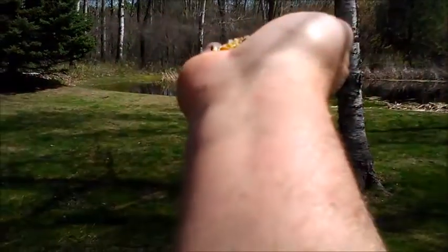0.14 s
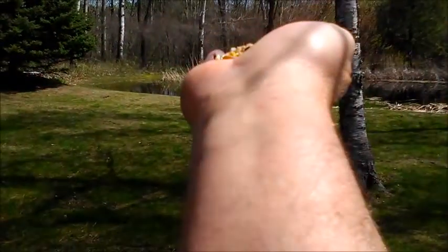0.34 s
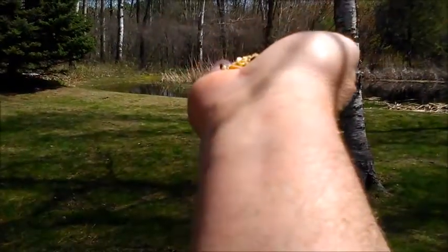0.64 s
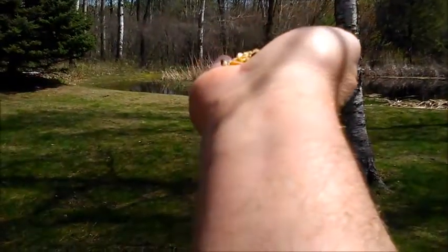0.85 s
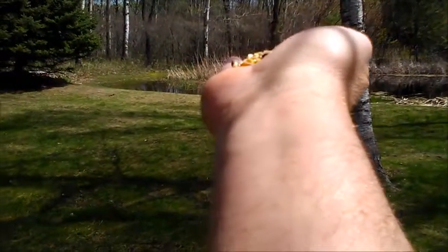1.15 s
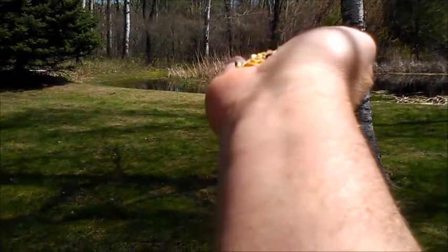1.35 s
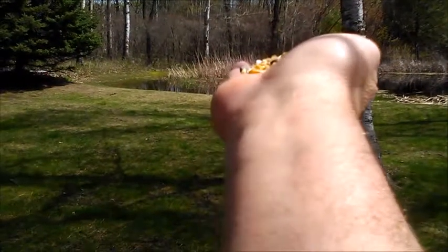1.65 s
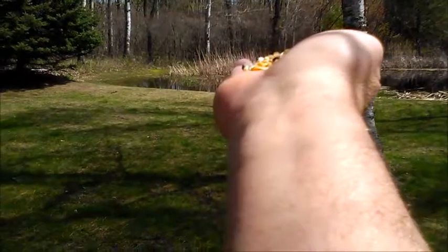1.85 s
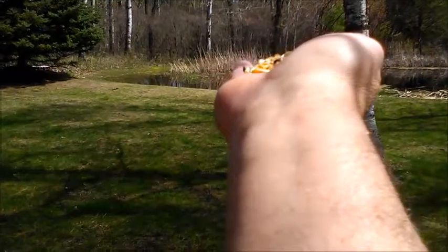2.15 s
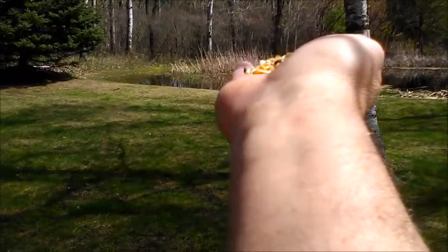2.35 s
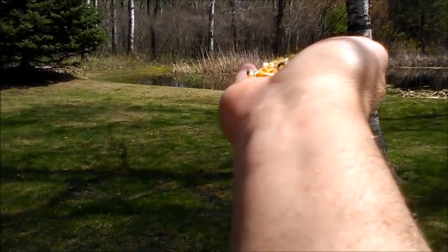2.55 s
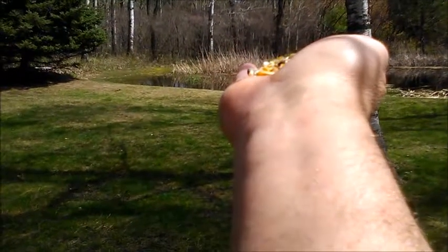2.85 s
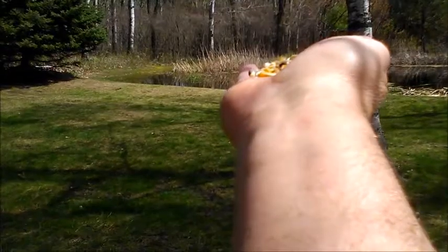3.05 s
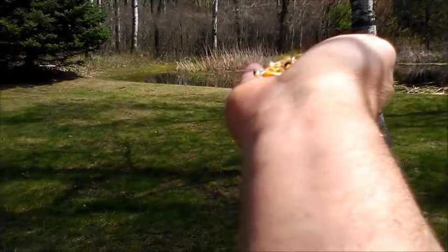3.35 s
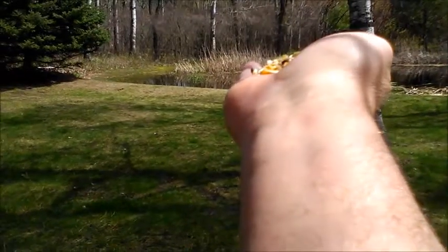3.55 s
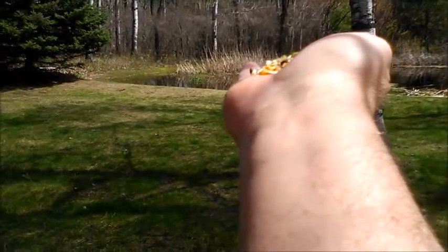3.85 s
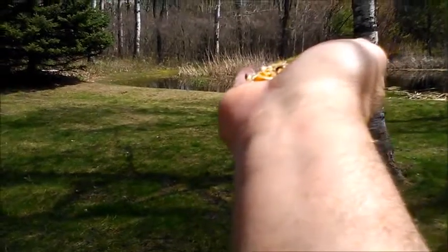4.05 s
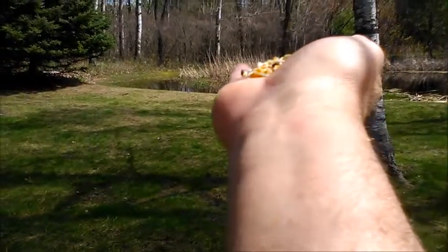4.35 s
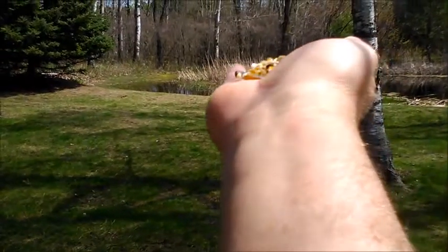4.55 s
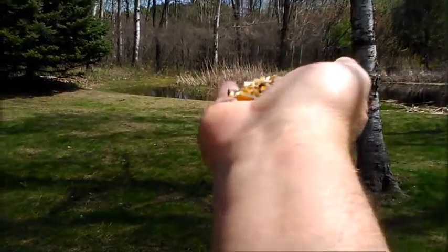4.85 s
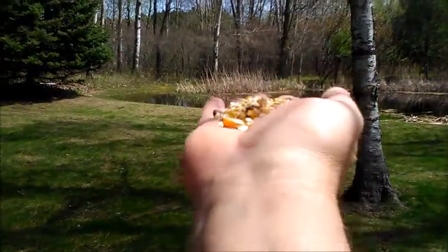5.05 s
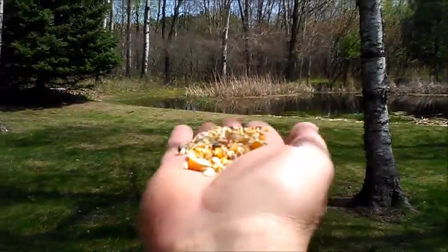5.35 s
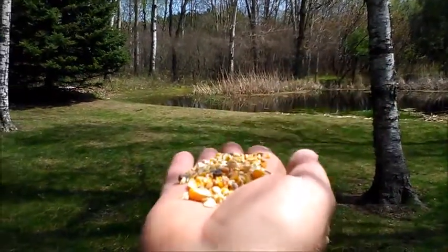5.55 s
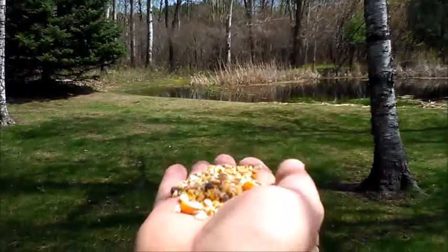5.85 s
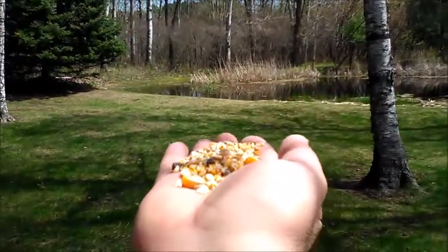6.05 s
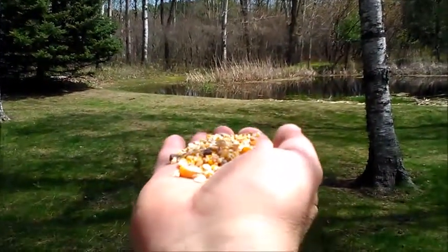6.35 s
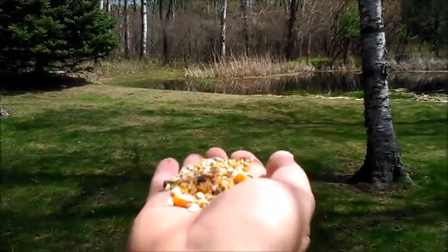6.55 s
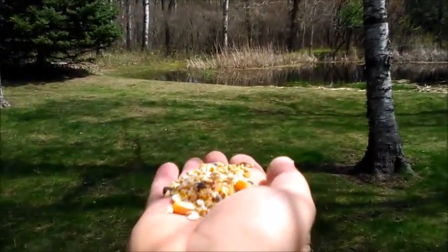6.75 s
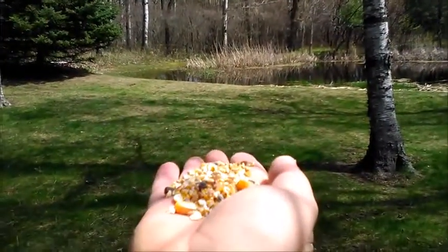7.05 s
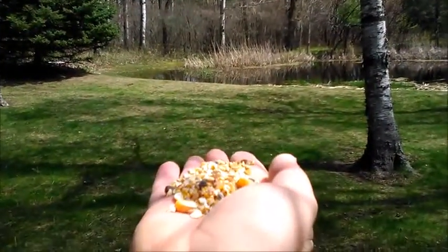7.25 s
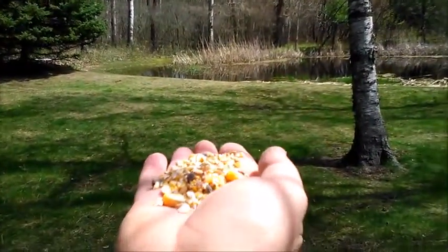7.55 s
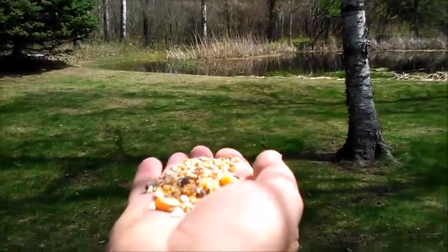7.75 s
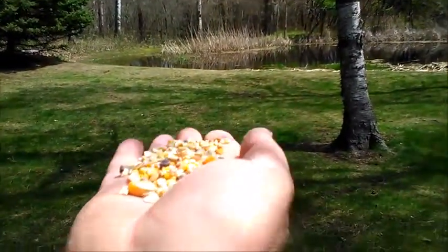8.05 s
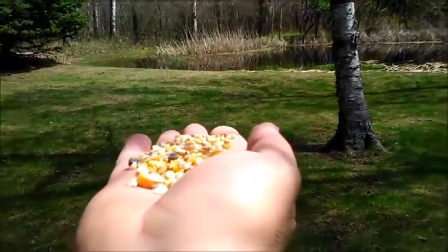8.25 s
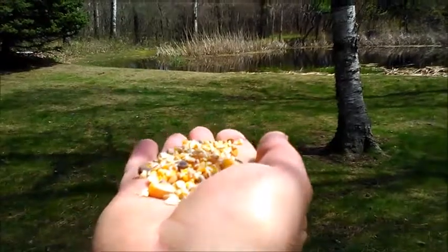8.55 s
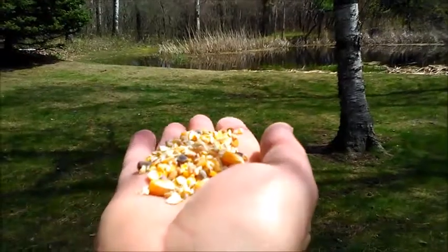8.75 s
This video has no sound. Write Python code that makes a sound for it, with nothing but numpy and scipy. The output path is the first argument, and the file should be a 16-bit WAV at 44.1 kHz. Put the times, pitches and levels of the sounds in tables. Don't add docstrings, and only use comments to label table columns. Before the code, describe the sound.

A quiet lawn beside a pond and trees, heard through a small hand-held microphone with faint hum and thin hiss. Low wind rumble opens, fading by 0.3 s. High thin chips lead into a quick, raspy chickadee gargle at 0.6 s, ending in a tiny rattle. Dull breeze thumps bunch at 1.3-1.9 s. More chips at 1.7 s precede the loudest gargle at about 2 s. From 1.9 to 4.2 s a distant sparrow trills evenly, about ten notes a second, slowing slightly, with faint wavering whistles. A calm stretch follows, with a very faint insect buzz from 4.5 to 6.7 s. Sharp notes come at 5.5-5.9 s and 6.3 s, then a last gargle at 6.5 s amid heavy thumps lasting past 7 s. At 7.1-7.6 s three rising chicks and three hazy notes lead to two hoarse, buzzy dees at 7.7 and 7.9 s. Soft wind thumps and rumble close near 8.9 s.

```python
import sys
import numpy as np
from scipy import signal
from scipy.fft import rfft, irfft, next_fast_len
from scipy.io import wavfile
from scipy.ndimage import uniform_filter1d, map_coordinates

SR = 44100
rng = np.random.default_rng(int(sys.argv[2]) if len(sys.argv) > 2 else 0)


def elevation(decibels):
    levels = np.asarray(decibels, float)
    return 10 ** (levels / 20)


def materialize(psi):
    bounded = np.clip(np.atleast_2d(psi).T, -1, 1)
    quanta = np.round(bounded * 32767).astype(np.int16)
    wavfile.write(sys.argv[1], SR, quanta)


N = 393372

# (time [s], kick level [dB], rumble level [dB])
PUFFS = [(0.022, -43, -39.5), (1.04, -69, -43.5), (1.335, -41.5, -35), (1.388, -35.5, -36),
         (1.484, -42, -30.5), (1.539, -24.5, -37.5), (1.856, -43.5, -42.5), (2.263, -67, -37),
         (3.52, -51.5, -43), (3.615, -70, -40.5), (4.238, -52, -50.5), (6.169, -61, -46),
         (6.56, -37.5, -41), (6.663, -30, -43), (6.678, -24.5, -34.5), (6.724, -28.5, -49),
         (6.775, -34.5, -34), (6.837, -24.5, -45), (6.94, -35, -42), (6.962, -28, -38),
         (7.015, -40.5, -44.5), (7.154, -39, -40.5), (7.266, -49, -41.5), (7.309, -39.5, -35),
         (7.457, -30, -37.5), (7.816, -40.5, -61), (8.341, -46, -41.5), (8.532, -45.5, -32),
         (8.767, -42, -44.5)]
# (time [ms], pitch [Hz], level [dB])
OPENING_STROKES = dict( tsip=[[(0, 6100, -11), (31.9, 5950, -2), (39.6, 5730, -2.5), (48.8, 4350, -7.5)]],
                   see=[[(0, 8800, -16), (6, 7800, -2), (20, 7500, 0), (24, 6800, -16), (30, 4800, -25)]],
                   blip=[[(0, 4150, -8), (7, 4250, 0), (11, 4400, -8)]], arch=[[(0, 4900, -15.5),
                   (4, 5650, -8.5), (13.9, 6340, -0.5), (17, 5000, -8.5), (21.9, 4260, -16)],
                   [(0, 9700, -37), (5, 11500, -36), (14, 12700, -38), (19, 8500, -39)]], )
RASP_STROKES = dict( rasp=[[(0, 4200, -23.5), (9, 4600, 6), (20, 4400, -5)], [(25.8, 4600, -11),
                (31, 4400, 12.5), (39.6, 4300, -29.5)]], rasp_mid=[[(17.93, 4700, -8), (21.06, 5600, 5),
                (25, 5950, 1.5), (29.1, 5700, 1), (32.6, 4500, -5)], [(33, 5500, -11), (38.8, 6800, -10.5),
                (47.5, 3600, -18)], [(0, 1700, -26), (8, 2450, -20.5), (13, 2800, -29), (25.6, 2450, -24)],
                [(33.1, 3200, -21), (38, 2900, -21), (50, 2750, -25.5)]], rasp_top=[[(0, 8300, -3),
                (13.1, 7000, 4.5), (34.3, 8400, 4)], [(0, 8600, -10), (20.2, 9600, 8), (28.8, 10300, -6.5)],
                [(29.8, 9200, 2.2), (37.4, 7600, 2)], [(2, 16000, -10), (38, 16000, -18.5)]])
CLOSING_STROKES = dict( ticks=[[(0, 5000, -12.5), (5, 4400, -9)], [(5, 7500, -7.5), (6.5, 5700, 2.5),
                   (10, 4250, -4)], [(21, 8300, -24), (29, 6500, -22)], [(30, 4500, -9), (36, 4300, -9)]],
                   end=[[(25, 1870, -16), (28.3, 2970, -10.5), (30.4, 3400, -12.5), (39.4, 3300, -21.5)],
                   [(24, 4200, -24), (29, 6500, -17)], [(46, 5600, -24), (53, 4200, -21)], [(42, 2950, -22),
                   (52, 2800, -18.5), (59.5, 1670, -32)]], )
# (rise [ms], top pitch [Hz], knee [ms])
CHICK_SHAPES = dict(long_chick=(57, 7920, 5.5), chick=(37, 7500, 8), short_chick=(20, 7120, 5.5))
# (time [s], core level [dB], low rasp level [dB], closing level [dB], lawn bounce delay [ms])
GARGLES = [
    (0.596, -36.5, -41, -66.5, .68),
    (1.965, -32, -40, -57.5, .68),
    (6.531, -38.5, -52.5, -58, 1.213),
]


def unit(x):
    return x / np.sqrt(np.mean(np.abs(x) ** 2) + 1e-20)


def along(points, hz):
    f, v = np.transpose(points)
    return np.interp(np.log(hz + 1), np.log(f + 1), v)


def curves(rows):
    s, *cols = np.transpose(rows)
    return [np.interp(np.arange(N) / SR, s, c) for c in cols]


def wobble(rate, size=N):
    knots = rng.standard_normal(int(size * 4000 / SR) + 4)
    return map_coordinates(knots, [np.arange(size) * min(rate, 4000) / SR])


def filtered(x, response):
    m = next_fast_len(len(x) + 8192)
    return irfft(rfft(x, m) * response(np.fft.rfftfreq(m, 1 / SR)), m)[:len(x)]


def noise(spectrum):
    return unit(filtered(rng.standard_normal(N), lambda hz: elevation(along(spectrum, hz))))


def gate(size, edge_ms):
    n = np.arange(size)
    to_edge = np.minimum(n, size - n)
    return np.sin(np.pi / 2 * np.clip(to_edge / (edge_ms * SR / 1000), 0, 1)) ** 2


def add(track, s, x):
    part = track[round(s * SR):][:len(x)]
    part += x[:len(part)]


def gusts():
    # (time [s], level [dB])
    steady_push = [(0.0, -41.5), (.26, -46), (.34, -69.5), (1.2, -57.5), (2.1, -60.5), (2.55, -69.5),
                   (3.7, -66.5), (3.86, -68), (4.07, -83), (4.12, -53), (4.45, -67), (6.5, -57.5),
                   (6.72, -46), (7.65, -58.5), (7.95, -47.5), (8.92, -38)]
    rise_s, hold_s, fall_db_per_s = 0.0071, 0.025, 163.5
    power = elevation(curves(steady_push)[0]) ** 2
    t = np.arange(SR // 2) / SR
    fall = elevation(-fall_db_per_s * np.clip(t - rise_s - hold_s, 0, 1))
    shape = np.clip(t / rise_s, 0, 1) * fall
    for s, _, db in PUFFS:
        add(power, s, (elevation(db) * shape) ** 2)
    return 10 * np.log10(power)


def steadied(x, share):
    envelope = np.abs(signal.hilbert(x, next_fast_len(N)))[:N]
    size = uniform_filter1d(envelope, size=900)
    return unit(x / (size + 0.21) ** np.clip(share, 0, 1))


def pops():
    ring_hz, kick_hz, rise_per_db, scatter = 55, 91.2, 0.029, 0.2
    out, t = np.zeros(N), np.arange(SR // 10) / SR
    for (s, db, _), chance in zip(PUFFS, rng.standard_normal(len(PUFFS))):
        hz = kick_hz * (1 + rise_per_db * (db + 35.5) + scatter * chance)
        swing = np.sin(2 * np.pi * np.cumsum(ring_hz + 1.93 * hz * np.exp(-t / 0.0088)) / SR)
        onset = (1 - np.exp(-t / 0.0035)) ** 2
        add(out, s, elevation(db + 7.0 - 60 * t / 0.083) * onset * swing)
    return out


def breeze():
    # (frequency [Hz], density [dB per Hz])
    thump_spectrum = [(27, -39.5), (40, -7), (55, -2), (85, -4.5), (130, -19.5), (200, -32), (350, -81)]
    puff_spectrum = [(60, -29), (130, 9), (200, -9.5), (320, -22.5), (600, -41.5), (1200, -88)]
    thump_db = gusts()
    thumps = unit(elevation(4.9 * wobble(8)) * steadied(noise(thump_spectrum), share=0.2))
    edge_level = elevation(-17.5 + 0.13 * (thump_db + 44.5))
    edge = edge_level * unit(elevation(2.6 * wobble(30)) * noise(puff_spectrum))
    return elevation(thump_db) * (thumps + edge) + pops()


def air():
    # (time [s], far hum level [dB], hiss level [dB])
    air_levels = [(0.0, -83, -80), (0.55, -86.5, -80), (2.2, -82, -80), (2.45, -85, -88.5), (4.1, -87, -92),
                  (5.69, -76.5, -85.5), (7.7, -82.5, -81.5), (8.92, -84, -96.5)]
    # (frequency [Hz], density [dB per Hz])
    hum_spectrum = [(88, -24), (150, -2.5), (403, -2.5), (529, -9.5), (726, -6.5), (1280, -19),
                    (2500, -26.5), (3250, -33), (5500, -120)]
    hiss_spectrum = [(5000, -21.5), (7800, -7), (13800, -12), (14300, -9.5), (14500, -64.5)]
    leaf_spectrum = [(900, -14.5), (1500, -4.5), (5500, -6), (9000, -10)]
    hum_db, hiss_db = curves(air_levels)
    t = np.arange(N) / SR
    whine = elevation(hiss_db - 1.5 + 1.6 * wobble(28)) * np.sin(2 * np.pi * 13480 * t + 2.0 * wobble(7.2))
    settling = noise([(150, 2.5), (700, -4.0), (3000, -15.0), (4500, -17.0), (9000, -38)])
    settling = elevation(-59 - 10 * np.clip((t - .2) / 0.13, 0, 3)) * settling
    hum = elevation(hum_db + 6.5 + wobble(9.4)) * noise(hum_spectrum)
    hiss = elevation(hiss_db + 4.5 + 1.3 * wobble(33)) * noise(hiss_spectrum)
    leaves = elevation(-83.5) * noise(leaf_spectrum)
    return hum + hiss + leaves + whine + settling


def background_dips(quiet):
    gap_times = [.278, 0.602, .96, 1.667, 1.793, 2.411, 2.581, 2.858, 2.935, 3.59, 3.901, 3.93, 3.989, 4.05,
                 4.568, 4.648, 4.8, 5.674, 5.76, 5.91, 6.037, 6.231, 6.272, 6.465, 6.632, 6.68, 7.084, 7.66,
                 7.85]
    gap_db, kept_share, band_hz = -15, .08, 90
    size = round(.024 * SR)
    out = quiet.copy()
    for s in gap_times:
        piece = quiet[round((s - .012) * SR):][:size] * gate(size, 5)
        kept = rng.random(300) < kept_share
        lines = filtered(piece, lambda hz: elevation(gap_db) + 2.0 * kept[(hz / band_hz).astype(int)])
        add(out, s - .012, lines - piece)
    return out


def syllables():
    # (time [ms], pitch [Hz], level [dB])
    loose_strokes = dict( seet=[[(0, 5960, 1.5), (14.2, 6050, 5.5), (26.6, 5500, -36)]],
                     pip=[[(0, 6000, -3), (4, 6900, 1.5), (8, 6400, -8)], [(3, 3300, -8), (14, 3350, -12)],
                     [(12, 5800, -10), (22, 5300, -13)]], hook=[[(0, 2900, -4), (9, 3500, 0),
                     (24, 1800, -3)]], chip=[[(0, 3100, -30), (4, 7090, 17.5), (12, 10100, -7.5)]],
                     tseet=[[(0, 6800, -6), (25.4, 7600, -1), (48.7, 7870, 7), (55, 5000, -12),
                     (59.2, 5060, -13)], [(10, 8400, -10), (29.8, 8600, -8)], [(39, 8900, -2),
                     (52, 9100, -15)]], )
    last_strokes = dict( a=[[(2.917, 3850, -23.5), (13.31, 4300, -12.5), (21.1, 5300, 0),
                    (25.35, 6200, 4.5), (28.9, 7000, 2.5), (30.6, 6500, 4), (33.3, 4900, -2),
                    (39, 3500, -28.5), (48, 2000, -25)], [(13.9, 4600, -4.5), (19.15, 6200, -4),
                    (22.1, 7500, -9), (30.2, 8300, -23), (39.7, 7300, -17)], [(31.9, 7100, -2),
                    (35.4, 5900, -3), (44, 4100, -18)], [(4, 1800, -36), (20, 2300, -32)]],
                    trill=[[(-1, 4100, -8), (1, 4800, -3), (4, 5600, -1), (7, 5750, 0), (14, 5800, -5)],
                    [(-10, 4000, -16), (-3.5, 4900, -12)]], tock=[[(0, 2390, 2), (4, 1780, 8.1)]])
    further_strokes = dict( flick=[[(30, 6100, -9), (38, 7600, -12)]], rise=[[(0, 5850, -16),
                       (14, 6200, -3), (22, 6250, 0), (27, 6150, -12)]], lilt=[[(0, 4700, 0), (16, 5150, 3),
                       (36, 5150, -3)]], droop=[[(0, 5500, -1), (20, 5350, 0), (36, 4800, -3)]],
                       thin=[[(0, 6700, -8), (18, 7150, -7), (55, 7250, 1), (91, 7300, 3)], [(56, 7300, 4),
                       (66.4, 6300, 3), (72, 5400, -10)]], blob=[[(0, 7600, -8.5), (12, 9200, -7),
                       (24, 5600, -2)], [(1.97, 5600, -9.5), (13, 7600, -1), (26.05, 6200, -8)]],
                       last=[[(0, 5820, 5.5), (3, 4460, -4), (8, 3880, -20)]])
    extra_strokes = dict(long_chick=[ [(20, 9100, -27), (34, 9800, -21), (50, 10200, -21)],
                     [(36, 2100, -36), (52, 2200, -35)]], chick=[[(7, 12100, -36), (15, 13200, -36)],
                     [(46, 3800, -30), (51, 2500, -37)]], short_chick=[[(-6, 4200, -16), (-1.5, 7000, -8)],
                     [(-10, 1900, -34), (0, 4000, -30)], [(7, 2200, -32), (20, 2000, -37)],
                     [(27, 4200, -24), (36, 2200, -33)]])
    start_hz, knee_hz, drop_ms, end_hz = 5020, 6170, 6.9, 3780
    out = {**OPENING_STROKES, **RASP_STROKES, **CLOSING_STROKES,
           **loose_strokes, **last_strokes, **further_strokes}
    for name, (ms, hz, knee_ms) in CHICK_SHAPES.items():
        rise = [(0, start_hz, -7), (.62 * knee_ms, knee_hz - 330, -1.5), (knee_ms, knee_hz, 1.5),
                (.55 * ms, .945 * hz, 2.5), (1.0 * ms, hz, -2.5), (ms, .975 * hz, -4)]
        drop = [(ms + 0.44 * drop_ms, 5700, -2.5), (ms + drop_ms, end_hz, -34)]
        second = [[(5, 9900, -29), (25, 8900, -26)], [(ms + 5, .96 * hz, -13), (ms + 14, 5400, -14)]]
        out[name] = [rise + drop] + second + extra_strokes[name]
    return out


def stroke(points, stretch, rough):
    ms, hz, db = np.transpose(points)
    flutter = wobble(700, size=4096), wobble(911, size=4096)
    t = np.arange(ms[0], ms[-1], 1000 / SR / stretch)[:4096]
    glide = uniform_filter1d(np.interp(t, ms, hz), size=40, mode="nearest")
    pitch = glide + 260 * rough * flutter[0][:len(t)]
    turn = 2 * np.pi * np.cumsum(pitch) / SR
    level = elevation(np.interp(t, ms, db)) * gate(len(t), 0.9)
    return level * (1 + rough * flutter[1][:len(t)]) * np.sin(turn)


def voiced(name, stretch, rough):
    # (frequency [Hz], density [dB per Hz])
    breath_spectrum = [(1500, -29.5), (4000, -8), (9500, 6.5), (11000, -10), (14000, -10)]
    note = np.zeros(SR // 8)
    for points in syllables()[name]:
        add(note, .02 + points[0][0] * stretch / 1000, stroke(points, stretch, rough))
    product = filtered(note ** 2, lambda hz: np.clip(hz / 1500, 0, 1) ** 4)
    breath = filtered(rng.standard_normal(len(note)), lambda hz: elevation(along(breath_spectrum, hz)))
    size = np.sqrt(np.abs(uniform_filter1d(note ** 2, size=200)))
    return note + elevation(-49.0 + 27.5 * rough) * product + elevation(-39 + 58.4 * rough) * size * breath


def echo(x):
    # (frequency [Hz], time to decay 60 dB [s])
    tree_decay = [(1500, 0.3), (4500, 0.18), (8000, 0.22), (13000, 0.15)]
    hz, t, z = signal.stft(rng.standard_normal(SR // 2), SR, nperseg=128)
    decay = elevation(-60 * t / along(tree_decay, hz)[:, None])
    tail = signal.istft(z * decay, SR, nperseg=128)[1]
    tail = tail * (1 + 1.2 * elevation(-60 * np.arange(len(tail)) / SR / 0.021))
    return signal.fftconvolve(np.pad(x, (130, 0)), tail / np.linalg.norm(tail) * 3.56)


def halo(x):
    size = round(44 * SR / 1000)
    haze = rng.standard_normal(SR // 10)[:size] * np.hanning(size)
    return signal.fftconvolve(x, haze / np.linalg.norm(haze), mode="same")


def sing(notes):
    roughness = dict(tsip=.12, see=.1, blip=.05, arch=.25, rasp=.45, rasp_mid=.25, rasp_top=.68, ticks=.2, end=.4, seet=.06, tock=.2, pip=.4, hook=.4, chip=.3, tseet=.09, long_chick=.2, chick=.15, short_chick=.2, a=.27, trill=.2, flick=.6, rise=.1, lilt=.3, droop=.3, thin=.35, blob=.42, last=.3)
    hazy = ("a", "tsip", "hook", "pip", "short_chick", "trill", "rasp", "rasp_mid", "rasp_top", "ticks",
            "end", "chip", "flick", "blob", "thin", "last")
    open_perch = {*OPENING_STROKES, *RASP_STROKES, *CLOSING_STROKES, *CHICK_SHAPES,
                  "a", "blob", "rise", "trill", "last"}
    out = np.zeros(N)
    for s, name, db, stretch in notes:
        echo_db = -17.5 + 19.5 * (name == "chip") - 6 * (name in open_perch)
        note = elevation(db) * voiced(name, stretch, roughness[name])
        halo_db = -7.5 + 3.5 * (name in ("a", "flick", "blob"))
        add(out, s - .02, note + (name in hazy) * elevation(halo_db) * halo(note))
        add(out, s - .02, elevation(echo_db) * echo(note))
    return out


def chips():
    # (time [s], syllable, level [dB], stretch)
    chip_notes = [(0.286, "tsip", -48.5, 0.73), (.489, "see", -51, 0.98), (.538, "blip", -62, 0.88),
                  (1.737, "tsip", -48, 0.99), (1.86, "see", -42.5, 0.93), (1.908, "blip", -54.5, .9),
                  (2.125, "hook", -65.5, 1.06), (5.552, "seet", -50, 1.2), (5.58, "tock", -60, 1.6),
                  (5.7, "chip", -81, 0.92), (5.82, "tseet", -43, 0.95), (6.277, "tsip", -47, 1.05),
                  (6.421, "see", -47.5, 1.32), (6.469, "tock", -68.5, 1.65), (6.692, "pip", -50.5, 1.2),
                  (8.449, "chip", -83, 1.34), (4.28, "lilt", -80, 1), (4.385, "thin", -73.5, 1.1),
                  (4.51, "droop", -81, 1), (7.131, "blob", -40, 1.05), (7.954, "rise", -45.5, 1),
                  (7.212, "blob", -50.5, .8)]
    return sing(chip_notes)


def far_whistles():
    whistles = [(0.58, 0.62, 5300, 1700, -57.5), (0.29, 0.597, 3380, 53, -88.5),
                (0.441, 0.603, 2260, 58, -85), (1.914, 2.015, 2540, 70, -78.5),
                (0.404, 1.363, 375.3, 12.7, -76), (1.579, 1.67, 1670, 57, -78),
                (1.672, 1.77, 1680, 53, -78), (1.768, 1.87, 1660, 56, -83), (2.092, 2.79, 2876, 560, -75),
                (3.55, 3.632, 2538, 40, -64), (3.629, 3.776, 2553, 33, -68.5),
                (3.643, 3.72, 1573, 82, -76.5), (3.718, 3.905, 3220, 570, -78.5),
                (3.751, 4.246, 2750, 400, -87.5), (4.102, 4.516, 2800, 500, -80),
                (4.298, 4.405, 5080, 250, -83.5), (4.439, 4.58, 6900, 1300, -75.5),
                (5.358, 5.448, 4720, 1300, -77), (6.861, 7.108, 3380, 110, -85),
                (7.083, 7.274, 3390, 83, -84)]
    out = np.zeros(N)
    for start, end, hz, width_hz, db in whistles:
        t = np.arange(round((end - start) * SR)) / SR
        swell = np.sin(np.pi * (t / (end - start)) ** .55)
        paths = 0.42 + 30 / width_hz + wobble(width_hz, size=SR) + 1j * wobble(width_hz, size=SR)
        blur = paths[:len(t)] * elevation(2.7 * wobble(20, size=SR)[:len(t)])
        add(out, start, elevation(db + 3.0) * swell * (unit(blur) * np.exp(2j * np.pi * hz * t)).real)
    return out


def gargles():
    # (time after the arch [ms], syllable, part: 0 core 1 low rasp 2 closing, level [dB], stretch)
    gargle_string = [
        (0, "arch", 0, 3.5, 1.04),
        (41.2, "rasp", 1, -4, 1.01),
        (41.9, "rasp_mid", 0, -3.5, 1.01),
        (41.8, "rasp_top", 0, -19.5, .99),
        (105, "ticks", 0, -4.5, .95),
        (262.5, "end", 2, 18, .95),
    ]
    return [(s + ms / 1000, name, parts[part] + db, stretch)
            for s, *parts in GARGLES for ms, name, part, db, stretch in gargle_string]


def rattles():
    # (stroke start [Hz], stroke end [Hz], upper level [dB], lower level [dB], last stroke level [dB])
    rattle_voices = [
        (6320, 4150, -69.5, -64.5, -66),
        (6540, 4200, -59.5, -61.5, -40),
        (6900, 4670, -52.5, -61, -42),
    ]
    landings = [1.9, 1.2, 0.16]
    after_s, length_ms, strokes_per_s = .2, 64, 232
    out = np.zeros(N)
    for (s, *_), (top_hz, end_hz, upper_db, lower_db, _), landing in zip(GARGLES, rattle_voices, landings):
        t = np.arange(int(length_ms * SR / 1000)) / SR
        slow = lambda per_s: wobble(per_s, size=4096)[:len(t)]
        cycle = (t * strokes_per_s + .2 * slow(110)) % 1
        fall = np.clip(cycle / .75, 0, 1)
        pitch = end_hz + (top_hz - end_hz) * (1 - fall) ** 1.4 + 250 * slow(150)
        swell = np.sin(np.pi * fall) * (1 + landing * fall) * elevation(3 * slow(200))
        upper = np.sin(2 * np.pi * np.cumsum(pitch) / SR) * swell
        lower_hz = 3250 - 450 * cycle + 110 * slow(260)
        throb = np.sin(np.pi * cycle) ** 2 * elevation(4 * slow(140))
        lower = np.sin(2 * np.pi * np.cumsum(lower_hz) / SR) * throb
        x = (elevation(upper_db + 4.3 * t / t[-1]) * upper + elevation(lower_db) * lower) * gate(len(t), 2.7)
        x = x + elevation(-4) * halo(np.pad(x, (0, 900)))[:len(t)]
        add(out, s + after_s, x)
        add(out, s + after_s, elevation(-17) * echo(x))
    last = [(s + .2622, "last", db, .95) for (s, *_), (*_, db) in zip(GARGLES, rattle_voices)]
    return out + sing(last)


def bounced(x):
    s, *_, ms = np.transpose(GARGLES)
    n = np.arange(N)
    current = np.clip(np.searchsorted(s - .1, n / SR) - 1, 0, None)
    late = ms[current] * SR / 1000
    return x + elevation(-9.5) * map_coordinates(x, [n - late])


def trill():
    # (time [s], level [dB])
    trill_levels = [(1.89, -60), (2.19, -62.5), (3.0, -59.5), (3.47, -67), (3.97, -78), (4.07, -66.5),
                    (4.18, -64.5)]
    start_s, gap_s, slowing_s = 1.8935, .0974, 3.4e-6
    k = np.arange(24)
    s = start_s + gap_s * k + slowing_s * k ** 3
    db, chance = np.interp(s, *np.transpose(trill_levels)), rng.standard_normal((len(k), 2))
    return [(at, name, level + spread_db * c, 1.01) for at, level, row in zip(s, db, chance)
            for name, spread_db, c in zip(("trill", "flick"), (1.8, 3), row)]


def insect():
    # (time [s], level [dB])
    buzz_levels = [(4.5, -93), (5.38, -78.5), (6.75, -80)]
    t = np.arange(N) / SR
    mode = lambda f: 1 / (1 + ((f - 5880) / 90) ** 2) + 0.12 / (1 + ((f - 5700) / 500) ** 2)
    wing = filtered(rng.standard_normal(N), mode)
    beat = 1 + 0.2 * np.sin(2 * np.pi * 80 * t + 0.83 * wobble(6.6))
    start, end = buzz_levels[0][0], buzz_levels[-1][0]
    on = np.clip((t - start) * 10, 0, 1) * np.clip((end - t) * 10, 0, 1)
    return on * elevation(curves(buzz_levels)[0] + 8.5) * unit(wing * beat)


def chick_a():
    # (time [s], syllable, level [dB])
    chick_notes = [
        (7.097, "long_chick", -34.5),
        (7.19, "chick", -29.5),
        (7.298, "short_chick", -30.5),
        (7.384, "a", -32.5),
        (7.476, "a", -32),
        (7.57, "a", -32.5),
    ]
    return sing([(*note, 1) for note in chick_notes])


def resonances(modes):
    return lambda f: sum(elevation(db) * 1j * f * w / (c * c - f * f + 1j * f * w) for c, w, db in modes)


def dee(s, length, upper_db, lower_db, rate):
    rise_s, join_s, fall_s, soft_db = 0.016, 0.042, 0.0067, 7
    return [(s, upper_db - 6.0, lower_db - 16, rate),
            (s + rise_s, upper_db + 4.0, lower_db - 3.0, rate),
            (s + join_s, upper_db, lower_db, rate),
            (s + length - fall_s, upper_db, lower_db, rate),
            (s + length, upper_db - soft_db, lower_db - soft_db, rate)]


def dees():
    # (time [s], length [s], upper level [dB], lower level [dB], pulse rate [1/s], mouth resonance [Hz])
    dee_calls = [
        (7.669, 0.17, -59, -55.5, 290.5, 3180),
        (7.891, 0.17, -56, -53.5, 297, 3090),
    ]
    # (frequency [Hz], width [Hz], level [dB])
    throat_modes = [(1710, 1900, -21.5), (3810, 610, 2.5), (4806, 300, -5), (6200, 600, -16.5)]
    # (settled pitch [Hz], excess at the start [Hz], level [dB])
    upper_partials = [(3950, 94, -6), (5000, 198.5, -6), (5900, -400, -15.5)]
    brightness = [3, -3]
    join_s, scoop, scoop_s, sag_s, mouth_open_s = 0.042, .07, .018, .035, 0.023
    out = np.zeros(N)
    for (*row, mouth_hz), bright_db in zip(dee_calls, brightness):
        rows = dee(*row)
        span = slice(round(rows[0][0] * SR), round(rows[-1][0] * SR))
        upper_db, lower_db, rate = (c[span] for c in curves(rows))
        t = np.arange(len(rate)) / SR
        slow = lambda per_s: wobble(per_s, size=12000)[:len(t)]
        late_scoop = scoop * np.exp(-np.clip(t - join_s, 0, 1) / scoop_s)
        rate = rate * (1 - late_scoop + 0.00295 * slow(43.5))
        turn = 2 * np.pi * np.cumsum(rate) / SR
        pulses = sum(elevation(3 * slow(45)) * np.cos(k * turn + .55 * slow(150)) for k in range(5, 25))
        breath = rng.standard_normal(12000)[:len(t)] * (1 + 1.0 * np.cos(turn))
        source = unit(pulses) + .55 * breath
        throat, mouth = resonances(throat_modes), resonances([(mouth_hz, 460, 1.5)])
        opening = np.clip((t - join_s) / mouth_open_s + 1, 0, 1) * elevation(3.1 * t / t[-1])
        from_throat = filtered(source, lambda f: throat(f) * np.abs(throat(f)) ** 0.34)
        lower = unit(from_throat + opening * filtered(source, lambda f: mouth(f) ** 2))
        sag = np.exp(-t / sag_s)
        upper = np.zeros(len(t))
        for hz, over_hz, db in upper_partials:
            level = elevation(db + bright_db * (hz > 4400) + 1.9 * slow(68.0))
            pitch = hz + over_hz * sag + (32 + 140 * sag) * slow(293)
            upper += level * np.sin(2 * np.pi * np.cumsum(pitch) / SR)
        x = (elevation(upper_db + 5) * upper + elevation(lower_db) * lower) * gate(len(rate), 2.9)
        add(out, rows[0][0], x)
        add(out, rows[0][0], elevation(-22) * echo(x))
    return out


def scene():
    gargle_calls = bounced(sing(gargles()) + rattles())
    far_birds = far_whistles() + sing(trill())
    birds = chips() + far_birds + gargle_calls + chick_a() + dees()
    return (breeze() + background_dips(air() + insect()) + birds)[None]


def roll_off(x):
    return signal.sosfilt(signal.butter(12, 14390, fs=SR, output="sos"), x)


def record(dry):
    mix = filtered(dry[0], lambda hz: hz < 14350)[None]
    return roll_off(mix)


dry = scene()
out = record(dry)
materialize(out)
```